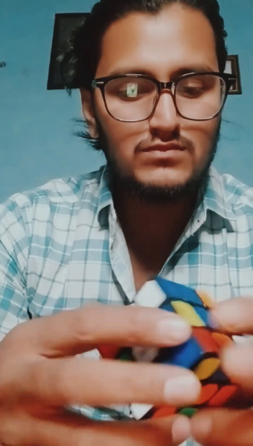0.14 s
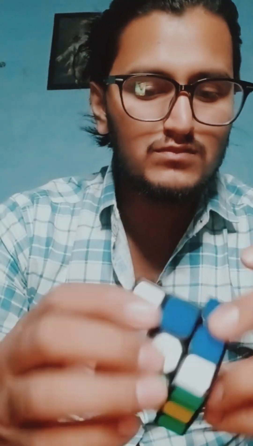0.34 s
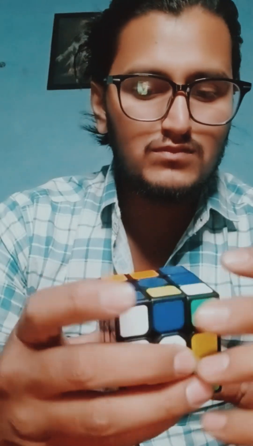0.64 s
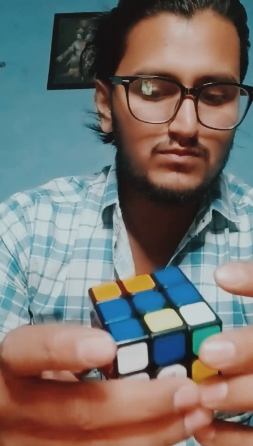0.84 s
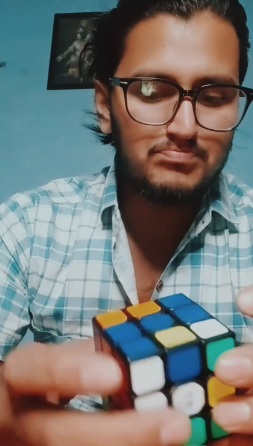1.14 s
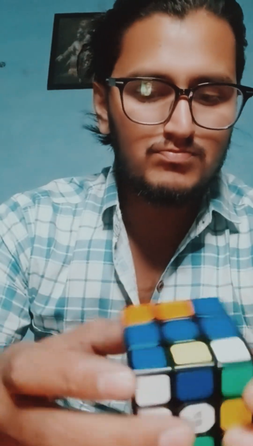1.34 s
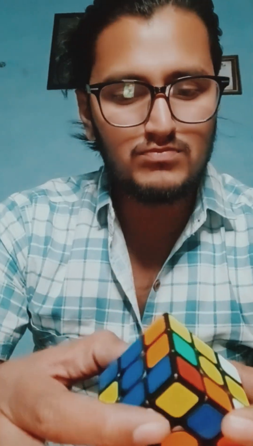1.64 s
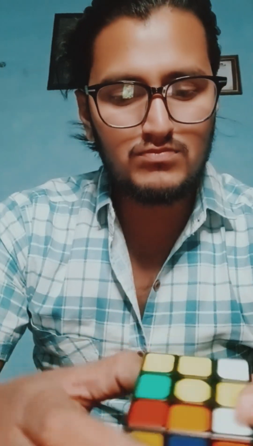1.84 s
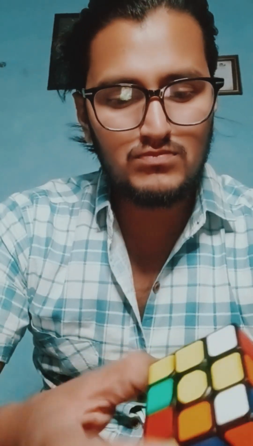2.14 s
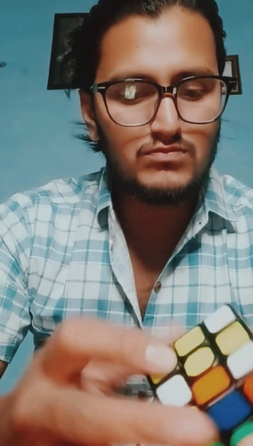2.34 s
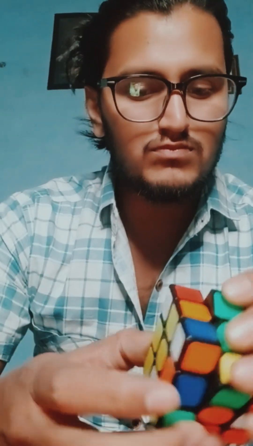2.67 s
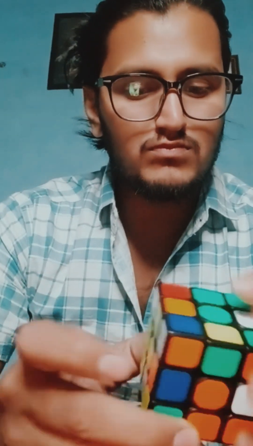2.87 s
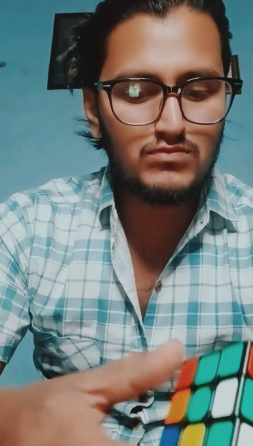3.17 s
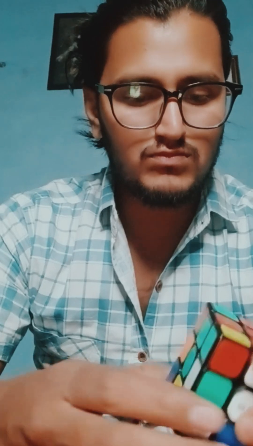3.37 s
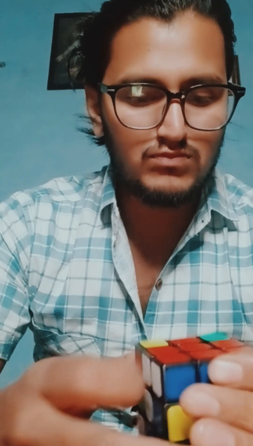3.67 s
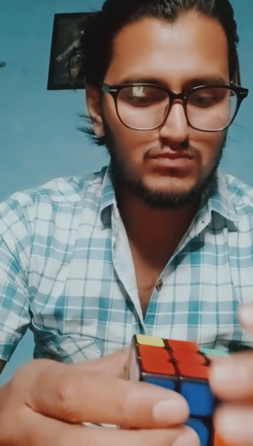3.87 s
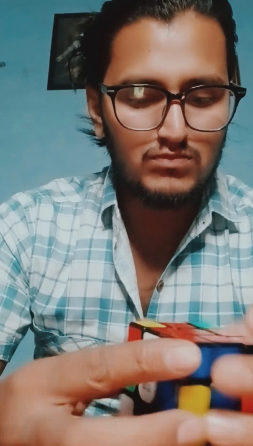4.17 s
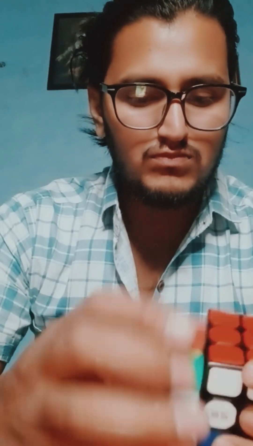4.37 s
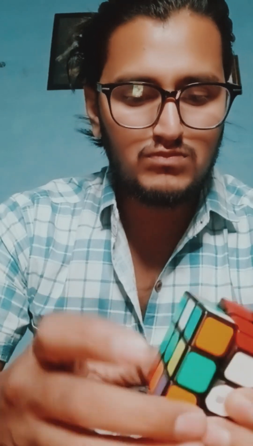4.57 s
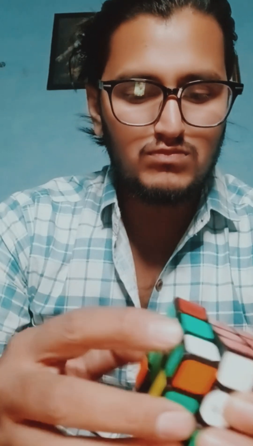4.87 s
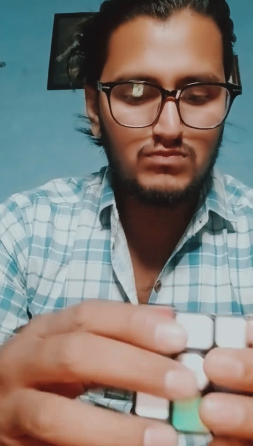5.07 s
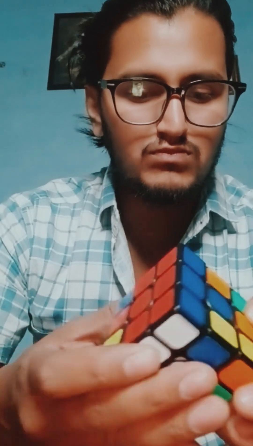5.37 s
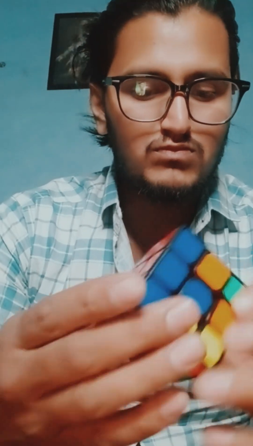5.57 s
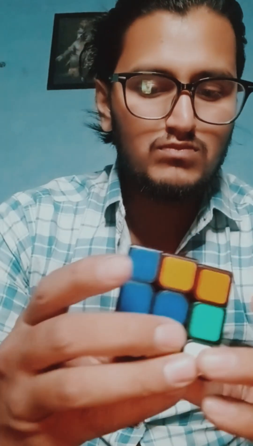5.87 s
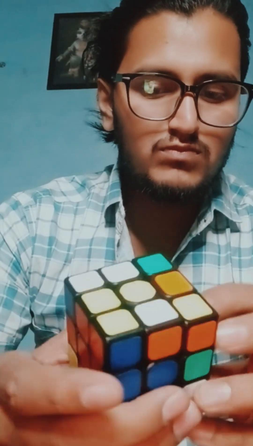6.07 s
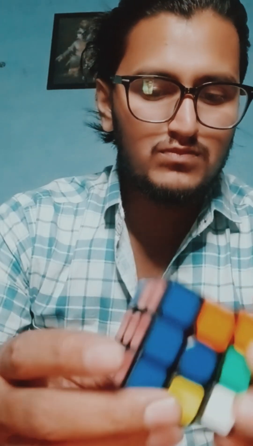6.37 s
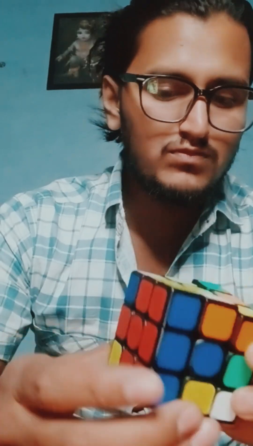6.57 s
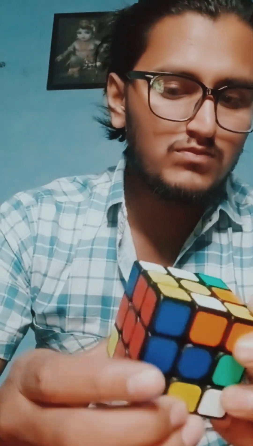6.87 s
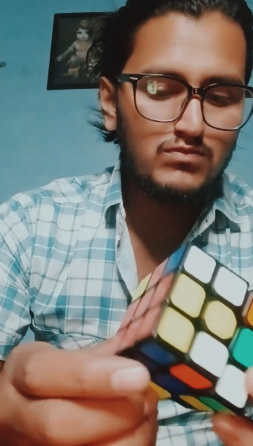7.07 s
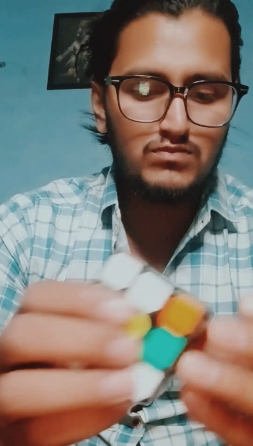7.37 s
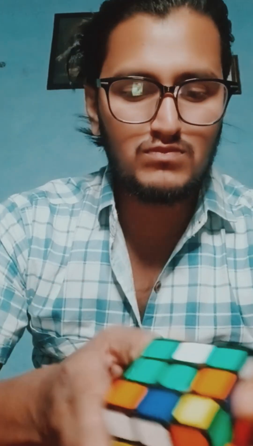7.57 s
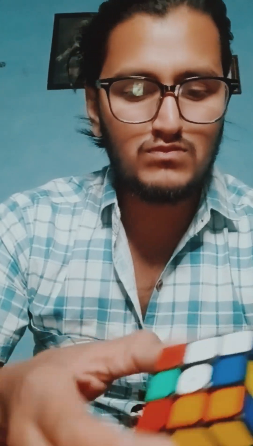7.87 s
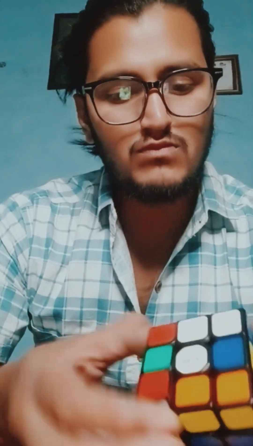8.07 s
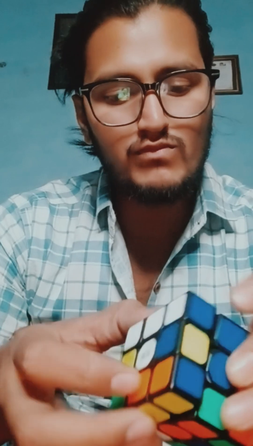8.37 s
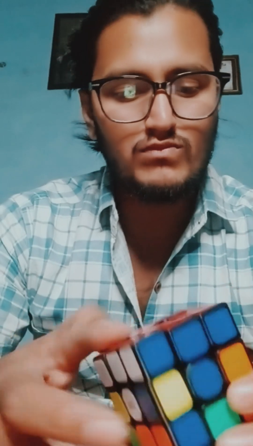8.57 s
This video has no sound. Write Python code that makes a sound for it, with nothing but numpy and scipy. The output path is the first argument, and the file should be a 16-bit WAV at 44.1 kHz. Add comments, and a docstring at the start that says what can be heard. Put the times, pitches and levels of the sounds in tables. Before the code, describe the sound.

Light plastic clicks, grainy sliding rubs and crisp snaps from a hand-twisted puzzle cube, ending in a dense rattle over faint low rumble.

```python
"""A plastic puzzle cube is turned by hand close to a phone in a quiet room, over a low steady rumble.
A few soft rubs and clicks come first; from 2 s layers slide with a dry, grainy rasp and snap into line.
After 5.7 s the turns thin out, then a dense cluster of clicks at 8.0-8.3 s fades into a last rub.
Clicks are blows and chatter, slides are random slips and noise; both ring hollow-piece resonances.
The small room answers with a short noise tail; the rumble is shaped noise."""
import sys
import numpy as np
from scipy import signal
from scipy.io import wavfile
from scipy.ndimage import uniform_filter1d

SR = 44100
rng = np.random.default_rng(int(sys.argv[2]) if len(sys.argv) > 2 else 0)


def transcribe(u):
    """Save the signal u as a 16-bit wav file named by the first command-line argument.

    u: samples, shape (n,) or (channels, n), limited to [-1, 1]; the rate is SR.
    q: integer samples, one column per channel.
    """
    v = np.clip(np.atleast_2d(u).T, -1, 1)
    q = np.round(v * 32767).astype(np.int16)
    wavfile.write(sys.argv[1], SR, q)


N = 384096

# ranges of the cube's sound: (low edge f/Hz, high edge f/Hz)
KNOCK_HZ, CLACK_HZ, SNAP_HZ = (460, 1100), (1100, 4300), (4300, 16000)


def amp(db):
    """Decibels to gain."""
    return 10 ** (np.asarray(db) / 20)


def unit(x):
    """Scales to rms 1, all channels together."""
    return x / np.sqrt(np.mean(x ** 2) + 1e-20)


def read(points, hz):
    """Interpolates a table of (f/Hz, value) on a log-frequency axis."""
    f, value = np.transpose(points)
    return np.interp(np.log(hz + 1), np.log(f), value)


def add(mix, start_s, sound):
    """Mixes a stereo sound in at start_s, cut at the end of the mix."""
    part = mix[:, round(start_s * SR):][:, :sound.shape[1]]
    part += sound[:, :part.shape[1]]


def band(x, edges_hz, order=3):
    """Keeps one range of frequencies (Butterworth band-pass)."""
    sos = signal.butter(order, edges_hz, "bandpass", fs=SR, output="sos")
    return signal.sosfilt(sos, x)


def clicks(gain_db=-2.0):
    """All the catches and snaps of the turning layers."""
    # plastic striking plastic: (t/s, clack level before gain_db/dB, knock re clack/dB, snap re clack/dB,
    # looseness [0-1], main resonance of the struck piece f/Hz)
    strikes = [(0.1554, -47.5, -9.5, -27, 0.23, 2120), (0.3462, -41, 2.5, -4, 0.92, 1650),
               (0.3887, -62, 16.5, -6, 0.71, 1510), (0.417, -56, 4, 5.5, 0.75, 1500),
               (0.712, -76, 0, 14.5, 1, 6200), (1.6075, -53, -18, -15, 1, 2070),
               (1.8222, -55, -19, -4, 0.97, 2100), (2.0677, -44.5, -2, -18, 0.35, 1440),
               (2.0733, -46.5, -1, -20, .6, 1490), (2.105, -37, -7.5, -6, 0.91, 2100),
               (2.1323, -35.5, 0.5, -7, 0.92, 1920), (2.2102, -49, -1, -10, 0.63, 1800),
               (2.2199, -36, -2, -3.5, .4, 1660), (2.2252, -27, -8, -4, 0.14, 1500),
               (2.48, -38, -14, -9, 0.39, 1600), (2.5248, -46.5, -2.5, -5, 0.86, 2000),
               (2.578, -41, -6, -13, .2, 2140), (2.632, -54, -5, -9, .8, 3100),
               (2.6528, -40, -8, -7, .1, 1600), (2.6727, -51, 6.5, 2, .3, 1310),
               (2.7097, -37, -9.5, 1, 0.12, 1670), (2.9665, -45, -17, -12, .3, 1980),
               (2.976, -57.5, -15, 12.5, .1, 6100), (2.9873, -43, -5, -6, 0.86, 1820),
               (3.0332, -40, -2.5, -6, 1, 1630), (3.1352, -50.5, -10, 9.5, 0.12, 5200),
               (3.2893, -28.5, -6.5, -8, 0.62, 1390), (3.547, -40.5, -5.5, -7.5, 0.41, 1930),
               (3.634, -35, -10.5, -8.5, 0.78, 1580), (3.678, -62, -23, 20, .5, 4760),
               (3.7123, -46, -12, 0.5, 0.57, 1990), (3.7262, -53, 3, -15, 0.88, 1410),
               (3.7835, -60, 5, -18, 1, 1430), (3.9048, -57, 8, -4, 0.78, 1580),
               (4.202, -49.5, -10, 0, .7, 5450), (4.227, -39.5, -7.5, -4.5, 0.8, 2900),
               (4.3238, -51, -2, -11, 0.86, 3200), (4.3583, -39.5, 0.5, -7, 0.86, 1550),
               (4.3741, -35, -1, -9, .3, 1560), (4.4004, -24, -23, -20, 0.76, 1690),
               (4.4555, -41, -16, -0.5, 0.23, 6500), (4.472, -49, -18, -2, 0.8, 1900),
               (4.6438, -60.5, 14, -12, 1, 1500), (4.674, -33.5, -19, -6, 0.92, 1470),
               (4.709, -53.5, 5, -3, 0.53, 1250), (4.863, -57, 11, -11, 0.25, 1550),
               (4.9346, -35.5, 0, -32, 0.71, 1950), (4.9541, -37, 0.5, -5.5, 1, 1910),
               (5.0232, -70, 20, -3.5, 0.44, 1130), (5.0919, -60.5, -12, 6.5, .8, 6670),
               (5.48, -52.5, -22, 1.5, 0.55, 5100), (5.5913, -33.5, 0.5, -1, 1, 1800),
               (5.6098, -41.5, 3.5, -12, 0.55, 1650), (5.617, -33, -10, -25, .3, 1610),
               (5.657, -56.5, 7.5, -28, 0.91, 1730), (6.229, -57, 1.5, -18, 0.87, 1600),
               (6.38, -57, -9, -16.5, 0.57, 2000), (7.0116, -37.5, -4.5, -8, 0.32, 1680),
               (7.0184, -36.5, -7.5, -4, 1, 3100), (7.044, -31.5, -7, -10, 0.44, 1570),
               (7.147, -76, -5, 12, .6, 7240), (7.2387, -44, -4, -26, 1, 1790),
               (7.3575, -64, 4, -13, 0.8, 1620), (7.5915, -53.5, -17, -9, 0.68, 2940),
               (7.901, -46.5, -12, -6, 0.84, 1740), (7.9846, -29.5, -9.5, -5.5, 0.57, 2360),
               (7.991, -35, 0, -17, 0.65, 2050), (8.0114, -30.5, -14, -8, .25, 1500),
               (8.015, -41, 1, -13, 0.56, 1400), (8.0212, -32, -16, -23, 1, 2350),
               (8.0282, -26.5, -2, 0, 0.42, 3280), (8.0942, -33.5, -17, -14, 0.092, 1600),
               (8.1083, -31.5, -17, -4, 1, 2060), (8.125, -35.5, -19, -6, 1, 2150),
               (8.127, -32, -10, -16, 1, 2340), (8.1316, -35, -15, -1, 0.9, 2550),
               (8.2623, -52.5, 4, -1, 1, 1950), (8.3023, -36.5, -5, -11, 1, 1650),
               (8.3115, -37, -5, -8, 0.62, 1480), (8.3227, -33, -18, -2, .2, 2260),
               (8.331, -36.5, -13, -15, 0.52, 1520), (8.6019, -66, 18, -15, 0.53, 1440)]
    lead_s = .004  # the blow falls this far into each click
    out = np.zeros((2, N))
    for hit_s, *strike in strikes:
        add(out, hit_s - lead_s, click(*strike))
    return amp(gain_db) * out


def click(level_db, knock_db, snap_db, loose, piece_hz, piece_db=7, apart=1.83, size=900):
    """A piece scrapes over an edge, hits home and chatters in its play."""
    # hollow cube when struck: (f/Hz, relative level/dB)
    struck_spectrum = [(250, -23), (440, -9.5), (640, 0), (1000, -13), (1500, -0.5), (2400, -3.5),
                       (3300, -5.5), (4300, -14), (5400, -3.5), (7000, -8.5), (8900, -31), (10800, -29.5),
                       (13300, -27), (16000, -30.5)]
    blow_s, scrape_gain, scrape_s, chatter_s = .004, .6, .0008, .0017
    level_window_s = .006  # level_db is the clack's rms as if its energy filled this time
    t = np.arange(size) / SR - blow_s

    bounces = rng.standard_normal((3, size)) * (rng.random(size) < .2)
    # the microphones share the low part of the chatter but not its treble
    bounces = bounces[0] + apart * np.gradient(bounces[1:], axis=1)
    scrape_env = scrape_gain * np.exp(-abs(t) / scrape_s)
    chatter_env = np.exp(-abs(t) / chatter_s)
    chatter = bounces * np.where(t < 0, scrape_env, chatter_env)

    # up to 2 samples early or late, drawn for each microphone
    blow = np.arange(size) == np.argmin(abs(t)) + rng.integers(-2, 3, (2, 1))
    loose = np.clip(loose, 0, 1)
    force = np.sqrt(1 - loose) * unit(blow) + np.sqrt(loose) * unit(chatter)
    body = ring(force, struck_spectrum, ripple_db=3.2, spacing_hz=300, piece_hz=piece_hz, piece_db=piece_db)

    # range strengths follow where the pieces meet and how the hand damps them
    levels = [(KNOCK_HZ, knock_db), (CLACK_HZ, 0), (SNAP_HZ, snap_db)]
    sound = sum(amp(db) * unit(band(body, edges_hz)) for edges_hz, db in levels)
    return amp(level_db) * sound * np.sqrt(level_window_s * SR / size)


def sliding(knock_db=-1.5, rasp_db=2.0, hiss_db=-0.7, count=7):
    """Plastic faces slide on each other, exciting a wandering mix of pieces."""
    rasp, hiss = friction()
    # pressure wanders from piece to piece at constant total power
    wander = unit(uniform_filter1d(rng.standard_normal((count, N)), size=4400))
    contact = amp(14 * wander)
    contact /= np.linalg.norm(contact, axis=0)
    pieces_hz = np.geomspace(1400, 3400, count)
    body = sum(share * rubbed_piece(hz) for share, hz in zip(contact, pieces_hz))
    levels = [(KNOCK_HZ, rasp * amp(knock_db)), (CLACK_HZ, rasp * amp(rasp_db)), (SNAP_HZ, hiss * amp(hiss_db))]
    return sum(gain * unit(band(body, edges_hz)) for edges_hz, gain in levels)


def friction():
    """Rasp and hiss strength over time: pushes add in power to the resting grip, made uneven by catching."""
    # pushes of a layer or finger, levels before the trims in sliding():
    # (start t/s, length t/s, rasp of the pieces level/dB, hiss of their surfaces level/dB)
    pushes = [(0.016, 0.025, -80, -73), (0.135, 0.095, -66.5, -70.5), (0.268, 0.054, -68.5, -59),
              (0.345, 0.014, -54, -50.5), (0.385, 0.054, -61, -58), (0.516, 0.021, -77, -61.5),
              (0.65, 0.064, -92, -84), (1.099, 0.032, -78.5, -71.5), (1.331, 0.02, -77.5, -74),
              (1.384, 0.066, -77, -71.5), (1.443, 0.015, -80, -63), (1.499, 0.059, -81, -71),
              (1.607, 0.0076, -61.5, -56.5), (1.756, 0.008, -82, -67.5), (1.819, 0.047, -66.5, -60.5),
              (1.952, 0.13, -84, -72.5), (2.073, 0.098, -53, -53), (2.212, 0.03, -50.5, -54.5),
              (2.389, 0.047, -63, -61), (2.482, 0.008, -66, -57), (2.537, 0.044, -54, -52),
              (2.642, 0.077, -65, -61), (2.71, 0.0079, -50.5, -51), (2.967, 0.029, -59, -60),
              (3.033, 0.011, -52.5, -54.5), (3.133, 0.021, -64.5, -55), (3.163, 0.076, -75, -62),
              (3.374, 0.012, -73, -76), (3.542, 0.045, -58.5, -54.5), (3.623, 0.11, -57, -53.5),
              (3.778, 0.0077, -61.5, -60.5), (3.903, 0.0077, -60.5, -58.5), (3.981, 0.014, -62, -57),
              (4.106, 0.14, -84, -74), (4.204, 0.067, -70.5, -63.5), (4.335, 0.0065, -58.5, -59),
              (4.365, 0.059, -45, -49), (4.457, 0.008, -49, -54), (4.534, 0.0059, -68.5, -60),
              (4.621, 0.029, -59, -55.5), (4.666, 0.024, -47.5, -50), (4.862, 0.076, -57.5, -61),
              (4.931, 0.0096, -47, -49.5), (5.035, 0.074, -73, -65), (5.162, 0.12, -87, -74.5),
              (5.204, 0.023, -78, -67.5), (5.304, 0.02, -89.5, -72), (5.38, 0.043, -69, -61.5),
              (5.487, 0.008, -63, -57.5), (5.588, 0.066, -51.5, -54.5), (5.76, 0.035, -72.5, -74.5),
              (5.997, 0.0056, -67, -58), (6.115, 0.11, -86, -85), (6.219, 0.042, -71, -74),
              (6.31, 0.03, -93, -78), (6.376, 0.0073, -63.5, -68), (6.507, 0.0076, -59, -63),
              (6.89, 0.0056, -74, -76.5), (7.025, 0.029, -46, -49.5), (7.242, 0.032, -61.5, -61),
              (7.365, 0.0091, -70.5, -74), (7.435, 0.014, -65, -66.5), (7.485, 0.061, -66, -55.5),
              (7.577, 0.03, -60.5, -53.5), (7.661, 0.091, -66.5, -64), (7.813, 0.04, -63.5, -60.5),
              (7.898, 0.077, -69.5, -68), (7.984, 0.03, -50.5, -50), (8.109, 0.028, -40.5, -42),
              (8.13, 0.082, -59.5, -61.5), (8.285, 0.054, -46.5, -47.5), (8.349, 0.21, -69.5, -69),
              (8.614, 0.054, -80.5, -73.5)]
    rise_db_per_s, ease_db, stop_db_per_s = 999.5, 4.5, 536
    # (rasp, hiss); opposite signs: the hiss dips slightly as the rasp swells
    catch_db = np.array((2.5, -0.3))
    grip_db = (-95, -88)  # fingers never quite still

    t = np.arange(0, N / SR, .001)
    power = amp(grip_db)[:, None] ** 2
    for start_s, length_s, *levels_db in pushes:
        rise = -rise_db_per_s * np.maximum(start_s - t, 0)
        ease = -ease_db * np.clip((t - start_s) / length_s, 0, 1)
        stop = -stop_db_per_s * np.maximum(t - start_s - length_s, 0)
        power = power + amp(np.array(levels_db)[:, None] + rise + ease + stop) ** 2

    uneven = unit(uniform_filter1d(rng.standard_normal(len(t)), size=4))
    catch = amp(catch_db[:, None] * uneven)
    sample_s = np.arange(N) / SR
    return [np.interp(sample_s, t, np.sqrt(p) * unit(c)) for p, c in zip(power, catch)]


def rubbed_piece(piece_hz):
    """Tiny slips of uneven size, over a finer friction noise, ring one piece."""
    # hollow cube when rubbed: (f/Hz, relative level/dB)
    rubbed_spectrum = [(250, -35.5), (450, -4.5), (630, 0.5), (1000, -11.5), (1700, 9), (2500, 1),
                       (3300, 1.5), (4300, -10), (5300, 2.5), (7200, -3), (8700, -34), (11000, -17),
                       (12500, -12), (16000, -21.5)]
    slips_per_s, spread_db, smooth_gain = 620, 3.4, .55
    slips = (rng.random(N) < slips_per_s / SR) * rng.choice([-1, 1], N)
    slips = slips * amp(spread_db * np.minimum(rng.exponential(1, N), 3))
    force = unit(slips) + smooth_gain * rng.standard_normal((2, N))
    return unit(ring(force, rubbed_spectrum, ripple_db=5.2, spacing_hz=210, piece_hz=piece_hz, piece_db=5))


def ring(x, spectrum, ripple_db, spacing_hz, piece_hz=1600, piece_db=0, octaves=0.18, size=1024):
    """Causal resonances of cube and piece: spectrum, main peak and a random ripple of lesser modes."""
    # cube at the two microphones: (f/Hz, left minus right level/dB)
    left_right = [(500, 4), (1300, 6), (2800, 2.5), (6000, 10), (9500, -6), (13000, 15)]
    hz = abs(np.fft.fftfreq(size, 1 / SR))
    mode = np.arange(size // 4)
    modes = np.clip(rng.standard_normal((3, size // 4)), -2, 2)
    # each microphone sees the modes from its own side
    ripple = np.array([np.interp(hz / spacing_hz, mode, modes[0] + .7 * side) for side in modes[1:]])
    peak = 1 / (1 + (np.log2((hz + 1) / piece_hz) / octaves) ** 2)
    balance_db = np.array([[.5], [-.5]]) * read(left_right, hz)
    db = read(spectrum, hz) + ripple_db * ripple + piece_db * peak + balance_db
    # minimum phase from the log magnitude
    log_response = np.conj(signal.hilbert(np.log(amp(db))))
    response = np.fft.ifft(np.exp(log_response)).real
    return signal.oaconvolve(x, response[:, :size // 2], axes=1)[:, :x.shape[1]]


def room(x, wet_db=-17, build_s=0.0011, size=16000):
    """Dense reflections of a small room: sparse noise taps, each band dying at its own speed."""
    # decay of the room: (f/Hz, t60/s)
    decay_t60 = [(400, 0.18), (1500, 0.17), (5000, 0.16), (14000, 0.17)]
    taps = rng.standard_normal((2, size)) * (rng.random((2, size)) < .15)
    hz, t, z = signal.stft(taps, SR, nperseg=256)
    decay = amp(-60 * t / read(decay_t60, hz)[:, None])
    z = z * decay * (1 - np.exp(-t / build_s))
    tail = signal.istft(z, SR, nperseg=256)[1]
    tail /= np.linalg.norm(tail, axis=1, keepdims=True)
    return amp(wet_db) * signal.fftconvolve(x, tail, axes=1)[:, :N]


def rumble(level_db=-56.5, left_db=0.5, size=2048):
    """Low room background: shaped noise, its level wavering in small patches of time and pitch."""
    # rumble density: (f/Hz, relative level per Hz/dB)
    rumble_spectrum = [(20, -35), (75, -6.5), (120, 4), (150, -2), (250, -10), (400, -9.5), (560, -18),
                       (1150, -22), (1400, -40.5), (3000, -39), (7000, -57), (9000, -68), (13000, -46),
                       (16000, -56)]
    # likeness at the two microphones: (f/Hz, correlation [0-1])
    likeness = [(30, 0.4), (60, 0.7), (130, 0.91), (290, 0.57), (640, 0.1), (1400, 0)]
    hz, _, (a, b) = signal.stft(rng.standard_normal((2, N)), SR, nperseg=size)
    same = np.clip(read(likeness, hz), 0, 1)[:, None]
    patches = uniform_filter1d(rng.standard_normal(a.shape), size=6, axis=1)
    patches = uniform_filter1d(patches, size=4, axis=0)
    waver_db = 1.7 * unit(patches)
    pair = np.array([a, same * a + np.sqrt(1 - same ** 2) * b])
    z = pair * amp(read(rumble_spectrum, hz)[:, None] + waver_db)
    noise = signal.istft(z, SR, nperseg=size)[1][:, :N]
    return amp(level_db + np.array([[left_db], [-left_db]])) * unit(noise)


def scene():
    """The cube close by, its room and the background."""
    cube = clicks() + sliding()
    return cube + room(cube) + rumble()


def record(dry):
    """Band limit of the phone: linear-phase low-pass at 15.9 kHz."""
    edge = signal.firwin(301, 15900, window=("kaiser", 8), fs=SR)
    return signal.oaconvolve(dry, edge[None], "same", axes=1)


dry = scene()
out = record(dry)
transcribe(out)
```